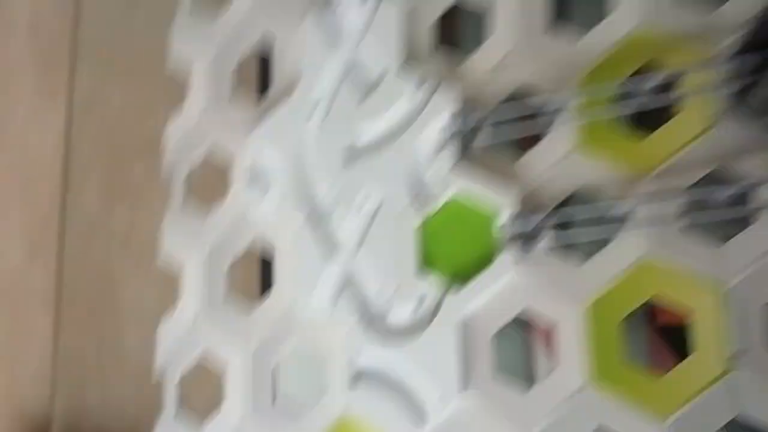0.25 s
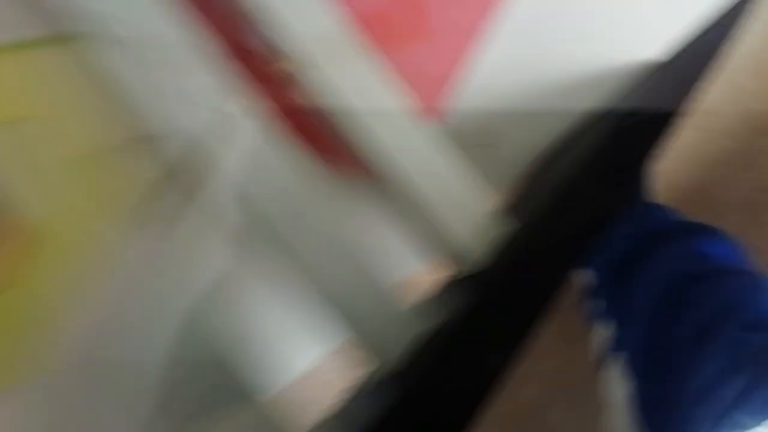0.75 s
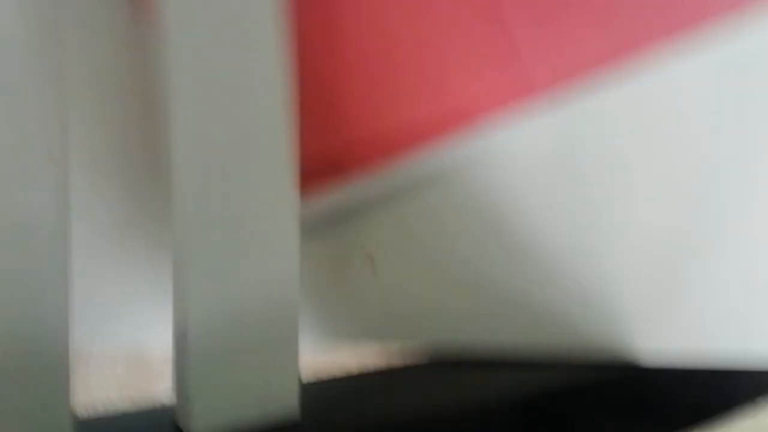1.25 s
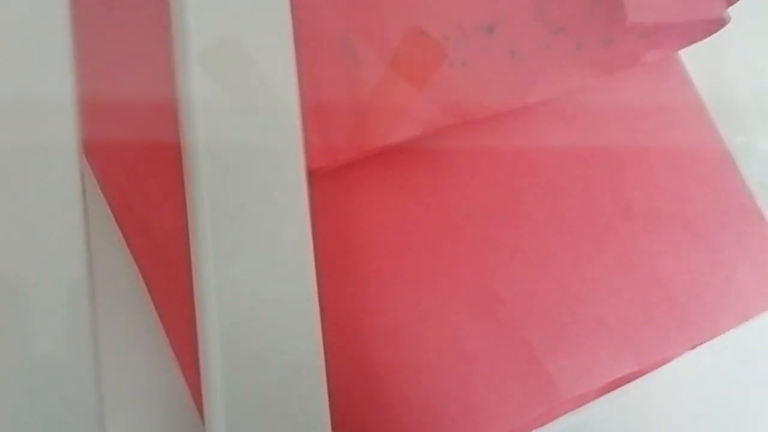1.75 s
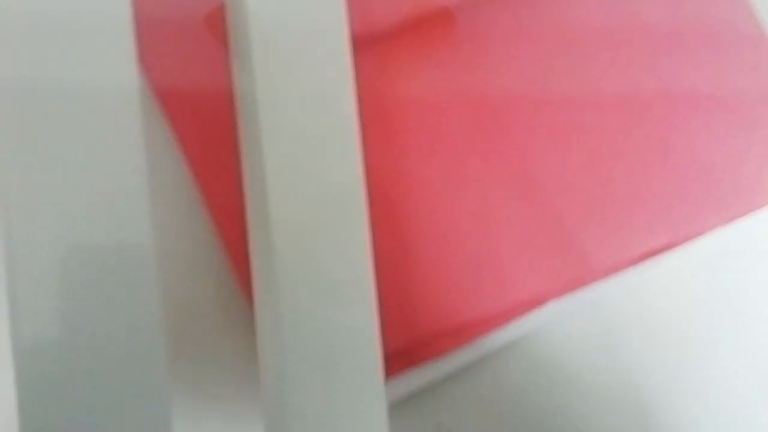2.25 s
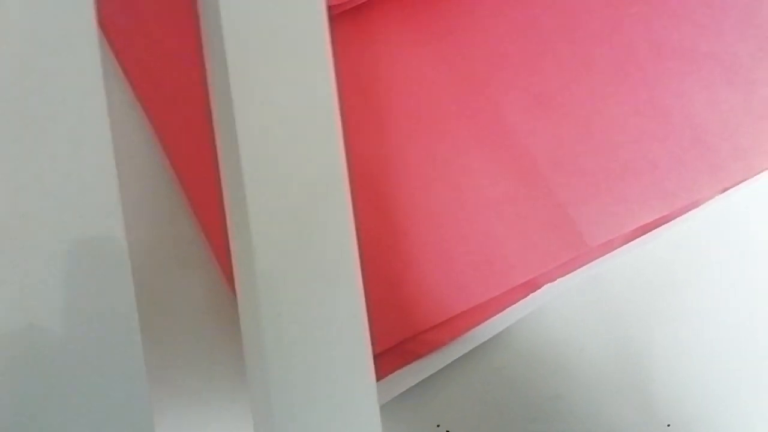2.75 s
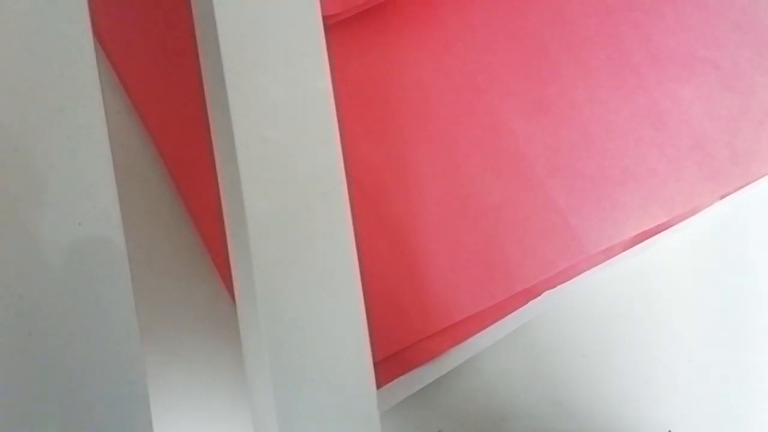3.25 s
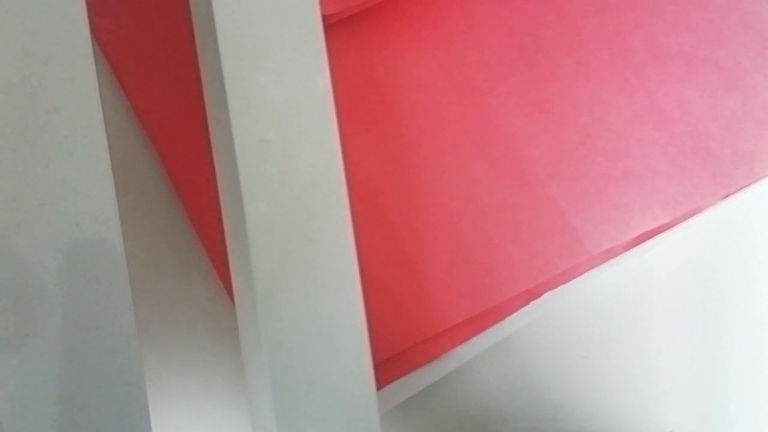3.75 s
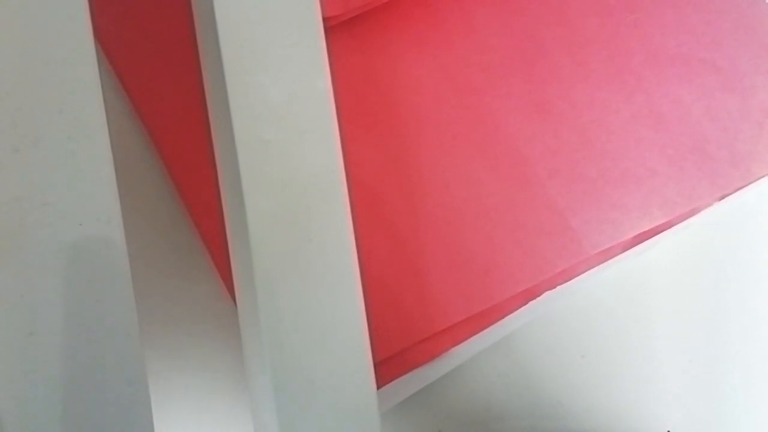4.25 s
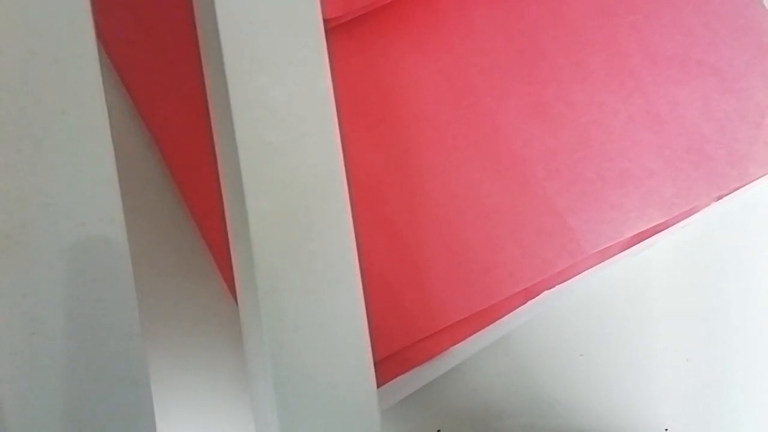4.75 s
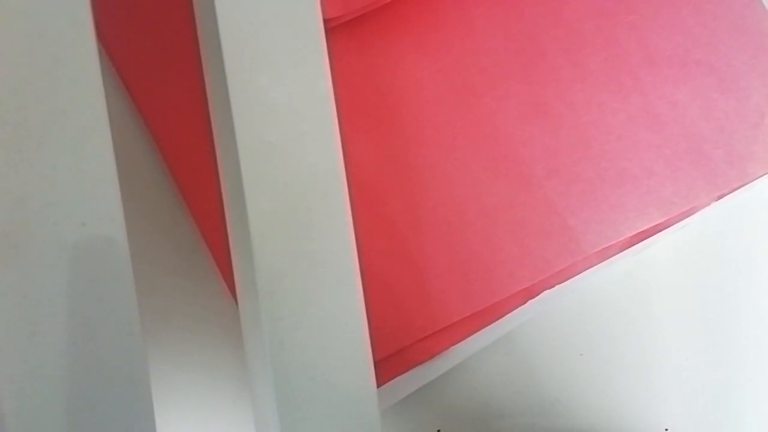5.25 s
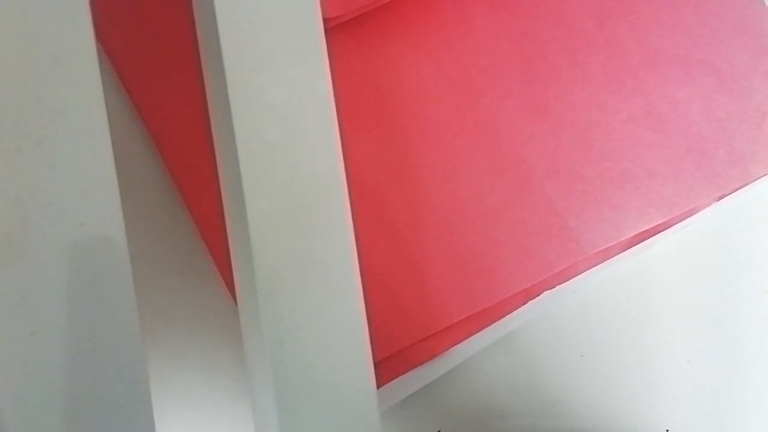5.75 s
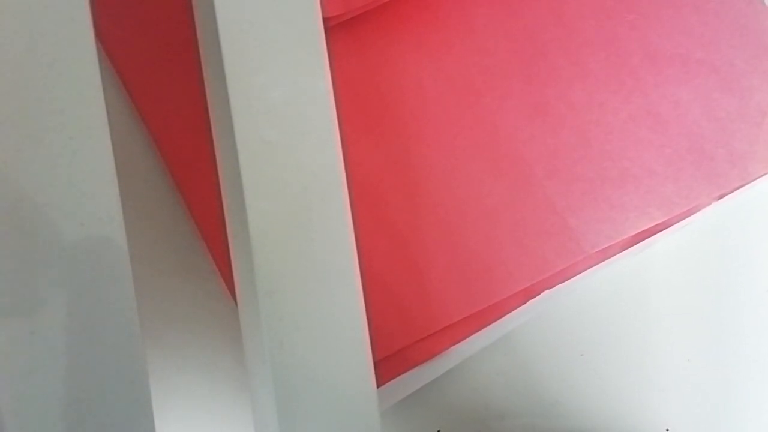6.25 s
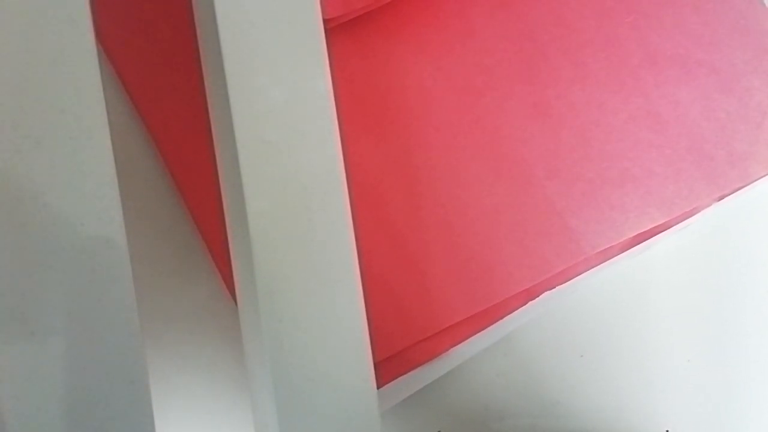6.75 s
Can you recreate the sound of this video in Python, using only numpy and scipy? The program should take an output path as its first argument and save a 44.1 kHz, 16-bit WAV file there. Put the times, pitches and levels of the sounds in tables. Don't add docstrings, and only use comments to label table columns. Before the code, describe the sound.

A microphone in a moving hand is knocked and set on a hard shelf. Soft rustling gives way to loud dry cracks with low jolts and quick chattering debris, then scraping and a final heavy bump. Stillness follows, over a faint room tone and hiss: delicate glassy taps of marbles on plastic track, irregular bounces, short skids and a thin rail rattle, clear on the right and muffled on the left.

```python
import sys
import numpy as np
from scipy import signal
from scipy.fft import rfft, irfft, next_fast_len
from scipy.io import wavfile
from scipy.ndimage import uniform_filter1d, minimum_filter1d

SR = 44100
rng = np.random.default_rng(int(sys.argv[2]) if len(sys.argv) > 2 else 0)


def convert_level_to_amplitude(level_db):
    exponent = np.asarray(level_db, float) / 20
    return 10 ** exponent


def output_pcm(signal):
    pcm = np.clip(np.atleast_2d(signal).T, -1, 1) * 32767
    wavfile.write(sys.argv[1], SR, np.round(pcm).astype(np.int16))


N = 308700

# frequency in Hz, density in dB per Hz.
ROOM_TONE_COLOUR = [(12, -47.5), (20, -6), (53, -5), (135, -23), (212, -10.5), (351, -30), (445, -22.5),
                    (565, -35.5), (1180, -24.5), (6000, -37.5), (7800, -71.5), (13200, -120)]
# time in seconds, level in dB.
GRIP_RUMBLE = [(0.0, -75), (.13, -67.5), (.36, -64), (.5, -49), (.68, -58), (1.07, -57.5), (1.36, -41.5),
               (1.6, -47), (1.83, -44), (1.93, -60.5), (2.2, -64), (2.32, -36), (2.42, -53.5),
               (2.55, -65.5), (4.93, -71), (6.57, -65), (6.86, -60.5), (7.0, -69)]
# frequency in Hz, density in dB per Hz.
GRIP_COLOUR = [(15, -18), (40, -4), (70, -4), (150, -9.5), (300, -15.5), (500, -25.5), (900, -58.5)]
# start in seconds, peak in dB, low mode in Hz, low mode share in dB.
KNOCKS = [(.097, -52.5, 1390, -4), (.408, -48, 1200, -0.5), (.441, -51, 730, 40), (.584, -44, 714, 39),
          (.683, -50, 902, 14), (.948, -51, 1090, -2), (.981, -45.5, 860, 0), (1.009, -38, 1776, 3),
          (1.0715, -23.5, 1000, -6), (1.139, -41, 1000, 2), (1.1905, -37, 700, -2), (1.659, -23, 1100, 0),
          (1.803, -13.5, 1837, 4.5), (1.999, -43, 1126, 23), (2.54, -50.5, 1249, 1)]
# start in seconds, peak in dB, high mode in Hz.
TICKS = [(.243, -54, 4430), (0.553, -50, 4020), (1.154, -42.5, 2940), (1.161, -51, 3000),
         (2.381, -39, 4500), (1.628, -32, 2580), (1.794, -29, 3440), (2.357, -44, 7540),
         (2.3887, -30, 4300), (2.409, -41, 3210), (2.442, -58, 3720), (2.47, -54, 4000), (2.709, -51, 3810),
         (2.776, -43.5, 4500), (5.692, -18, 3250)]
# start in seconds, peak in dB, low mode in Hz, high mode in Hz,
# edge in dB.
CRACKS = [(1.044, -9, 1040, 3640, -30), (1.2128, -1.5, 1680, 3680, -23), (1.296, -18.5, 1110, 3830, -34),
          (1.379, -2.5, 1790, 3460, -25), (1.469, -30, 1750, 3800, -38), (1.571, -37, 1755, 2730, -38),
          (1.644, -5.5, 1130, 2950, -20.5), (1.646, -6, 1249, 4200, -26.5), (2.248, -23, 2008, 3100, -45),
          (2.263, -28, 1294, 3100, -45), (2.334, -10.5, 2116, 2853, -42.5)]
# start in seconds, peak in dB, swing in Hz, jolt 0 to 4, direction +-1.
JOLTS = [(.1, -48, 80, 1.4, 1), (.241, -45.5, 47, 1.1, 1), (0.44, -28, 65.6, 1.94, -1),
         (0.466, -33, 137, .84, 1), (1.0461, -18.5, 62, 1.05, -1), (1.2123, -9, 62, 1.4, 1),
         (1.245, -15, 60, .8, 1), (1.378, -5, 57, 1.05, 1), (1.805, -34.5, 197.4, .53, 1),
         (2.234, -26.5, 42.7, 3.6, -1), (2.751, -34.5, 111, .74, -1), (2.773, -35.5, 107.5, .92, -1),
         (6.584, -37, 133.3, 1.4, 1)]
# start in seconds, peak in dB, swing in Hz, t60 in seconds,
# direction +-1.
SWAYS = [(0.525, -34, 126, 0.035, -1), (.584, -39.5, 600, 0.011, 1), (.683, -41, 550, 0.0095, 1),
         (.744, -41.5, 42.59, 0.059, -1), (.801, -37, 55.7, 0.084, -1), (1.045, -26, 480, .02, 1),
         (1.215, -20.5, 265, .05, 1), (1.38, -24.5, 249, 0.042, 1), (1.643, -19.5, 399.3, .02, -1),
         (2.333, -17, 26, 0.035, 1), (2.3425, -6, 48, 0.025, -1), (2.354, -25.5, 22, 0.034, 1),
         (2.757, -43.5, 56, 0.18, 1), (5.691, -38.5, 298.2, 0.076, -1), (5.7, -46.5, 50.4, 0.18, 1),
         (5.752, -42, 543, 0.054, 1), (6.581, -46, 45.4, 0.085, -1), (6.848, -40.5, 378, 0.01, 1),
         (1.6445, -13, 1200, .014, 1), (1.8035, -19, 1830, .014, 1), (1.8045, -25, 1150, .014, 1),
         (1.66, -30, 750, .03, 1)]
# frequency in Hz, density in dB per Hz.
RUB_COLOUR = [(300, -10), (700, -4), (950, -4), (1180, -3), (1450, -7.5), (2000, -3.5), (3900, 1.5),
              (5000, -7.5), (6500, -12), (10000, -22), (16000, -36)]
# time of most pressure in seconds, rub in dB, swell in seconds,
# fade in seconds, brightness in dB.
SLIDES = [(.11, -65, 0.065, 0.046, 1.5), (.251, -71, .18, 0.45, -7), (.469, -51, .083, 0.098, 6.5),
          (.6, -67, 0.1, .23, -6), (.88, -64.5, 0.22, 0.41, -1.5), (1.47, -43, .076, 0.16, -7),
          (1.55, -49, .069, 0.078, 4), (1.637, -34.5, 0.11, .19, 3), (2., -55.5, .13, 0.073, -5.5),
          (2.16, -49.5, 0.058, 0.17, 3), (2.209, -44, 0.053, 0.0773, 0.5),
          (2.265, -32.5, 0.055, 0.074, -1.5), (2.31, -45.5, .061, 0.067, -7),
          (2.4, -55.5, .071, 0.067, -0.5), (2.691, -60, .095, 0.11, -0.5), (2.9, -65.5, .41, 1, -1.5),
          (4.241, -56, .14, 0.075, -8), (4.37, -60.5, 0.12, 0.16, -10), (5.32, -59, .069, .089, -2.5),
          (5.687, -47.5, 0.036, 0.031, 1), (6.6, -61.5, .063, 0.053, -13), (6.861, -61.5, 0.22, 0.1, -13)]
# time of most pressure in seconds, rub in dB,
# fade in seconds, brightness in dB.
SKIDS = [(1.062, -51.5, 0.18, -8), (1.239, -22, 0.029, 9.5), (1.263, -30, 0.041, -3.5),
         (1.3, -39, 0.094, -3), (1.397, -25.5, .065, -3), (1.808, -47, 0.089, -9.5),
         (3.498, -67.5, 0.1, -8), (4.04, -59.5, 0.069, -7.5), (4.999, -69, .11, 6),
         (5.227, -44, 0.055, 3.5), (5.467, -55.5, 0.036, -9.5), (5.709, -43.5, 0.14, 4),
         (6.131, -46.5, 0.12, 0), (6.215, -45.5, 0.09, 0), (6.24, -57.5, 0.12, -4)]
# start in seconds, peak in dB, frequency in Hz, t60 in seconds.
PINGS = [(3.136, -56, 1700, 0.044), (3.137, -56, 4100, 0.036), (2.9, -60.5, 2525, 0.033),
         (3.576, -64.5, 2100, 0.045), (3.58, -64, 2530, 0.042), (3.727, -56, 2110, 0.023),
         (3.727, -70, 4000, 0.019), (1.046, -42, 1340, .09), (1.047, -38, 860, .1),
         (1.807, -41.5, 3800, .12), (1.075, -42.5, 2700, .06), (1.455, -40, 1000, .08),
         (1.05, -33, 310, .06), (1.65, -36, 300, .06), (4.98, -62, 2985, 0.045), (5., -61, 4300, 0.052),
         (1.804, -32, 3470, 0.018), (1.518, -42, 1930, 0.12), (6.105, -36, 3290, 0.025),
         (5.693, -24.5, 3170, 0.012)]
# start in seconds, peak in dB, high mode in Hz.
CLATTERS = [(1.218, -16, 3752), (1.2209, -20, 2870), (1.224, -13, 3082), (1.2284, -9, 3610),
            (1.2317, -14.5, 4350), (1.235, -11.5, 3830), (1.2372, -9, 4120), (1.2405, -8, 4400),
            (1.2426, -14, 3765), (1.2462, -13, 4780), (1.248, -13, 3620), (1.2514, -17, 3030),
            (1.2551, -20, 4660), (1.2588, -16, 4580), (1.2611, -12, 3810), (1.2633, -17, 3050),
            (1.267, -16.5, 2620), (1.2709, -19, 4100), (1.2746, -20, 2890), (1.2789, -23, 3086),
            (1.2824, -26.5, 4030), (1.2849, -24, 3790), (1.3869, -18.5, 3860), (1.3906, -15.5, 4070),
            (1.3928, -9, 4180), (1.3956, -9.5, 3700), (1.4015, -23, 2310), (1.4034, -23, 3770),
            (1.4062, -15, 3670), (1.4105, -21, 3490), (1.413, -24, 3637), (1.4151, -23.5, 2860),
            (1.417, -23, 3477), (1.4212, -27, 2790), (1.4244, -23.5, 2730), (1.4288, -23, 3420),
            (1.4334, -27, 3930), (1.4363, -25.5, 3330), (1.4413, -36, 2300)]
# start in seconds, peak in dB, plastic base share in dB.
SHAKES = [(3.459, -53.5, -13), (3.475, -51.5, -8), (3.4887, -54, -12.5), (3.5038, -55, -5.5),
          (3.5265, -53, -12), (3.5444, -62, 9), (4.2258, -47, -21), (4.2417, -49.5, -4),
          (4.3905, -47.5, -13), (6.7123, -47, -12.5), (6.733, -59, -13), (6.7595, -51.5, -6),
          (6.8005, -48.5, -11)]
# frequency in Hz, level in dB, t60 in seconds.
RAIL_MODES = [(332, 1, 0.052), (710, -5.5, .1), (1090, -6.5, .06), (1965, 1, 0.045), (2270, -9, .04),
              (2970, -4, 0.031), (3310, -6, 0.039), (3961, -1, 0.04), (4200, -8.5, 0.032), (5030, -21, .03),
              (5370, -22, .03)]
# start in seconds, peak in dB, low mode in Hz, high mode in Hz,
# low mode share in dB.
TAPS = [(4.011, -37.5, 1323, 4700, -11.5), (4.424, -44.5, 804, 3370, -3.5), (4.468, -36.5, 2100, 2500, -1),
        (4.532, -32.5, 2030, 4850, -5), (4.596, -32, 1953, 2510, -14.5), (5.173, -42.5, 1750, 2664, -20),
        (5.213, -32, 1185, 5250, -8), (5.461, -38, 1137, 3470, -1), (5.705, -30.5, 2105, 4170, -17),
        (6.104, -23.5, 1198, 4490, -13), (6.197, -40, 1595, 2700, 3), (5.228, -42, 1150, 4900, 3.5),
        (6.205, -44, 1700, 3500, -1), (6.244, -45, 1397, 3300, -2), (6.584, -39, 1700, 2800, -1)]
# start in seconds, peak in dB, high mode in Hz.
BOUNCES = [(4.107, -55.5, 3210), (4.184, -49, 3580), (4.322, -43.5, 3300), (4.344, -42.5, 2530),
           (4.356, -45, 2570), (4.679, -50, 2814), (5.257, -46, 5100), (5.403, -57, 3000),
           (6.19, -48, 3400), (6.211, -47, 4500), (6.231, -46, 4000), (6.122, -43, 3300),
           (6.141, -47, 5000), (5.775, -50, 3300), (5.822, -53, 2600), (5.449, -50, 3640),
           (5.843, -54.5, 2830), (6.221, -42, 3900), (6.553, -49.5, 3920), (6.561, -48, 2100),
           (6.851, -42, 3300)]
# start in seconds, ring in dB.
DROPS = [
    (4.468, -37.5),
    (4.532, -35),
    (4.5962, -29),
]
# frequency in Hz, level in dB, t60 in seconds.
DROP_MODES = [
    [(960, -2, .035), (1380, -5, 0.045), (1693, -15, .15), (1925, -7, .07), (2024, 0, .09), (2500, -2, .03),
     (2845, -4.5, 0.071), (3060, 6.5, .035), (3230, -10, 0.086), (5012, -16, .06)],
    [(972, -6.5, 0.048), (1432, -7, 0.15), (2030, 3, .05), (2180, -10, .12), (2649, -18, .15),
     (2820, 0, .06), (3340, -3, .032), (3876, -7.5, .12), (4850, -2, .04), (5430, -5, .04)],
    [(1410, -13, .13), (1706, -17, .15), (1935, 5, 0.028), (2116, -5, .1), (2520, 9, .035), (2676, -3, 0.1),
     (2950, 5, .04), (3683, -8.5, .06), (4371, -5, .08), (5378, -16, .05)],
]
# frequency in Hz, density in dB per Hz.
HISS_COLOUR = [(180, -25), (300, -1.5), (355, -14), (449, -14.5), (1340, -23), (1580, -21), (8220, -25),
               (16600, -35.5)]

ROOM_TONE_DB, WHINE_HZ, WHINE_DB = -67, 1850, -84.5
CRACK_LOW_DB, KNOCK_HIGH_HZ, KNOCK_EDGE_DB = -7.5, 3000, -26
TICK_LOW_HZ, TICK_LOW_DB, TICK_EDGE_DB = 1700, -20.5, -15
JOLT_T60_S = 0.022
SLIDE_DRAG_DB, SLIDE_HISS_DB = -6, -15
SKID_SWELL_S, SKID_DRAG_DB, SKID_HISS_DB = .017, -1, -16.5
DRAG_PER_BRIGHT = -0.96
CLATTER_LOW_HZ, CLATTER_LOW_DB, CLATTER_EDGE_DB, CLATTER_DB = 1180, -8.5, -21.5, -3
BOUNCE_LOW_TO_HIGH, BOUNCE_LOW_DB = .48, -13.5
TAP_TOP_DB, TOP_DB_PER_OCTAVE = -4.5, 6.5
PORT_DB, HISS_DB = 10, -71
LEFT_LAG_SAMPLES, LEFT_CUTOFF_HZ = 22, 305


def level(x, db):
    return x * convert_level_to_amplitude(db) / np.sqrt(np.mean(x ** 2))


def colour(x, points):
    hz, db = np.transpose(points)
    size = next_fast_len(len(x))
    bin_hz = np.maximum(np.arange(size // 2 + 1) * SR / size, 1)
    gain = convert_level_to_amplitude(np.interp(np.log(bin_hz), np.log(hz), db))
    return irfft(rfft(x, size) * gain, size)[:len(x)]


def band(x, lo_hz, hi_hz):
    return signal.sosfilt(signal.butter(3, [lo_hz, hi_hz], "band", fs=SR, output="sos"), x)


def walk(rate_hz):
    hold = int(SR / rate_hz)
    steps = np.repeat(rng.standard_normal(N // hold + 1), hold)
    return 1.6 * uniform_filter1d(steps, hold)[:N]


def add(out, s, x, db):
    i = int(s * SR)
    x = x[:N - i]
    out[i:i + len(x)] += convert_level_to_amplitude(db) * x / np.max(np.abs(x))


def ring(hz, gain, t60_s, rise_s, phase=0):
    t = np.arange(int(np.max(t60_s) * SR) + 99)[:, None] / SR
    modes = gain * np.sin(2 * np.pi * hz * t + phase) * convert_level_to_amplitude(-60 * t / t60_s)
    return (modes * (1 - np.exp(-t / rise_s))).sum(axis=1)


def strike(low_hz, high_hz, low_db, top_db, edge_db, t60_s, rise_s, crowd_db, bottom_hz, chance):
    hz = np.geomspace(bottom_hz, 13000, len(chance[0])) * np.exp(0.031 * chance[0])
    knee_hz = [500, low_hz, min(high_hz, 5200), min(1.25 * high_hz, 5250), 5300, 6800, 14000]
    knee_db = [low_db - 6.0, low_db, 0, top_db, top_db, edge_db, edge_db - 12.5]
    db = np.interp(np.log(hz), np.log(knee_hz), knee_db)
    db += crowd_db + 1.2 * chance[1]
    life_s = 0.42 * t60_s * (2000 / hz) ** 0.072
    main_hz, main_db = [low_hz, high_hz], [low_db - 2, -3]
    main_life_s = t60_s * np.array([.6, .35])
    phase = np.r_[2 * chance[2], 0, 0]
    return ring(np.r_[hz, main_hz], convert_level_to_amplitude(np.r_[db, main_db]), np.r_[life_s, main_life_s], rise_s, phase)


def room_tone():
    noise = colour(rng.standard_normal(N), ROOM_TONE_COLOUR)
    return level(noise, ROOM_TONE_DB) * convert_level_to_amplitude(1.7 * walk(2))


def whine():
    return convert_level_to_amplitude(WHINE_DB + 3.0 * walk(18)) * np.sin(2 * np.pi * WHINE_HZ * np.arange(N) / SR)


def hand():
    s, db = np.transpose(GRIP_RUMBLE)
    rumble = level(colour(rng.standard_normal(N), GRIP_COLOUR), 0)
    return convert_level_to_amplitude(np.interp(np.arange(N) / SR, s, db) + 3.0 * walk(25)) * rumble


def knocks():
    rows = [(s, db, low_hz, KNOCK_HIGH_HZ, low_db, KNOCK_EDGE_DB) for s, db, low_hz, low_db in KNOCKS]
    rows += [(s, db, TICK_LOW_HZ, high_hz, TICK_LOW_DB, TICK_EDGE_DB) for s, db, high_hz in TICKS]
    rows += [(*row[:-1], CRACK_LOW_DB, row[-1]) for row in CRACKS]
    out, chances = np.zeros(N), rng.standard_normal((len(rows), 3, 40))
    for (s, db, low_hz, high_hz, low_db, edge_db), chance in zip(rows, chances):
        hit = strike(low_hz, high_hz, low_db, -5.5, edge_db, 0.023, 0.00007, -7.0, 520, chance)
        add(out, s, hit, db - 3.5)
    return out


def room(x, t60_s, wet_db):
    t = np.arange(int(t60_s * SR)) / SR
    wash = band(rng.standard_normal(len(t)), 900, 5200) * convert_level_to_amplitude(-60 * t / t60_s) * (t > .003)
    wash /= np.sqrt(np.sum(wash ** 2))
    return x + convert_level_to_amplitude(wet_db) * signal.fftconvolve(x, wash)[:N]


def thumps():
    out, shudder = np.zeros(N), np.zeros(N)
    rows = [(s, db, hz, JOLT_T60_S, jolt, side) for s, db, hz, jolt, side in JOLTS]
    rows += [(s, db, hz, t60_s, 0, side) for s, db, hz, t60_s, side in SWAYS]
    shudder_fade = convert_level_to_amplitude(-60 * np.arange(SR // 4) / SR / 0.13)
    for s, db, hz, t60_s, jolt, side in rows:
        t = np.arange(int(t60_s * SR) + 9) / SR
        turns = hz * (t + jolt * .004 * (1 - np.exp(-t / 0.0011)))
        add(out, s, side * np.sin(2 * np.pi * turns) * convert_level_to_amplitude(-60 * (t / t60_s) ** 2), db)
        add(shudder, s, shudder_fade, db - 21.5)
    return out + shudder * level(band(rng.standard_normal(N), 130, 480), 0)


def rub():
    grains = rng.standard_normal(N) * convert_level_to_amplitude(1.6 * rng.exponential(size=N)) * (rng.random(N) < .04)
    skin = colour(level(grains, -1.2) + rng.standard_normal(N), RUB_COLOUR)
    t, pressure = np.arange(N) / SR, np.zeros((3, N))
    rows = [(*row, SLIDE_DRAG_DB, SLIDE_HISS_DB) for row in SLIDES]
    rows += [(s, db, SKID_SWELL_S, fall_s, bright_db, SKID_DRAG_DB, SKID_HISS_DB)
             for s, db, fall_s, bright_db in SKIDS]
    for s, db, rise_s, fall_s, bright_db, drag_db, hiss_db in rows:
        span = slice(max(int((s - 2 * rise_s) * SR), 0), int((s + 2 * fall_s) * SR))
        swell_db = -24 * np.maximum((s - t[span]) / rise_s, (t[span] - s) / fall_s) ** 1.5
        layer_db = np.array([[0], [drag_db + DRAG_PER_BRIGHT * bright_db], [hiss_db + bright_db]])
        pressure[:, span] += convert_level_to_amplitude(db + swell_db + layer_db)
    layers = []
    for edges in (np.geomspace(2000, 5500, 6), np.geomspace(330, 2000, 6), np.geomspace(5500, 16000, 3)):
        patches = np.zeros(N)
        for lo_hz, hi_hz in zip(edges, edges[1:]):
            patches += convert_level_to_amplitude(2.1 * walk(70)) * band(skin, lo_hz, hi_hz)
        layers.append(level(patches, 0))
    return convert_level_to_amplitude(1.2 * walk(120)) * (pressure * layers).sum(axis=0)


def pings():
    out = np.zeros(N)
    for s, db, hz, t60_s in PINGS:
        note = ring(hz * np.array([1, .94, 1.045, 1.1]), np.array([1, .6, .7, .45]), t60_s, .003)
        add(out, s, note, db - 3)
    return out


def clatter():
    out, chances = np.zeros(N), rng.standard_normal((len(CLATTERS), 4, 40))
    for (s, db, high_hz), chance in zip(CLATTERS, chances):
        low_hz = CLATTER_LOW_HZ * (1 + .015 * chance[3, 0])
        hit = strike(low_hz, high_hz, CLATTER_LOW_DB, -6, CLATTER_EDGE_DB, 0.022, .0006, -10.5, 600, chance)
        add(out, s, hit, db + CLATTER_DB)
    return out


def rail():
    out, chances = np.zeros(N), rng.standard_normal((len(SHAKES), 3, 2 * len(RAIL_MODES)))
    hz, mode_db, t60_s = np.tile(np.transpose(RAIL_MODES), 2)
    twin = np.arange(len(hz)) >= len(RAIL_MODES)
    for (s, db, base_db), chance in zip(SHAKES, chances):
        start_s = s - .003
        phase = 2 * np.pi * hz * int(start_s * SR) / SR
        phase = phase + (hz / 3000 + 2 * twin) * chance[1]
        gain = convert_level_to_amplitude(mode_db + base_db * (hz < 1200) + 1.6 * chance[0] - 4.0 * twin)
        add(out, start_s, ring(hz * (1 + .03 * twin * chance[2]), gain, .8 * t60_s, .006, phase), db - 2)
    return out * convert_level_to_amplitude(2.2 * walk(260))


def taps():
    rows = TAPS + [(s, db, BOUNCE_LOW_TO_HIGH * hz, hz, BOUNCE_LOW_DB) for s, db, hz in BOUNCES]
    out, chances = np.zeros(N), rng.standard_normal((len(rows), 3, 40))
    for (s, db, low_hz, high_hz, low_db), chance in zip(rows, chances):
        top_db = TAP_TOP_DB + TOP_DB_PER_OCTAVE * np.log2(high_hz / 3200)
        hit = strike(low_hz, high_hz, low_db, top_db, top_db - 17.5, 0.049, 0.00086, -9, 934.0, chance)
        add(out, s, hit, db - 2.5)
    return out


def drops():
    out = np.zeros(N)
    for (s, db), modes in zip(DROPS, DROP_MODES):
        hz, mode_db, t60_s = np.transpose(modes)
        hz = np.r_[hz, 1.035 * hz]
        gain = convert_level_to_amplitude(np.r_[mode_db, mode_db - 4.0])
        life_s = np.tile(np.minimum(.75 * t60_s, .12), 2)
        add(out, s, ring(hz, gain, life_s, 0.00069, 2 * np.pi * rng.random(len(hz))), db)
    return out * convert_level_to_amplitude(2.5 * walk(200))


def scene():
    near_hits = room(knocks() + clatter(), 0.11, -20.0)
    shelf_hits = room(pings() + rail() + taps() + drops(), 0.17, -12.5)
    handling = hand() + thumps() + rub()
    mix = convert_level_to_amplitude(PORT_DB) * (near_hits + shelf_hits) + handling + room_tone() + whine()
    return np.tile(mix, (2, 1))


def top_cut(x):
    return signal.sosfilt(signal.butter(12, 16800, fs=SR, output="sos"), x)


def record(dry):
    limit_gain = minimum_filter1d(np.minimum(1, .97 / (np.abs(dry[1]) + 1e-9)), size=257)
    right = dry[1] * uniform_filter1d(limit_gain, size=129)
    right = signal.sosfilt(signal.ellip(6, .2, 30, 16000, fs=SR, output="sos"), right)
    pole = np.exp(-2 * np.pi * LEFT_CUTOFF_HZ / SR)
    late = np.roll(uniform_filter1d(right, size=3), LEFT_LAG_SAMPLES + 2)
    left = signal.lfilter([1 - pole], [1, -pole], late)
    hiss = [level(colour(rng.standard_normal(N), HISS_COLOUR), HISS_DB) for _ in dry]
    return top_cut(np.array([left, right]) + hiss)


dry = scene()
out = record(dry)
output_pcm(out)
```